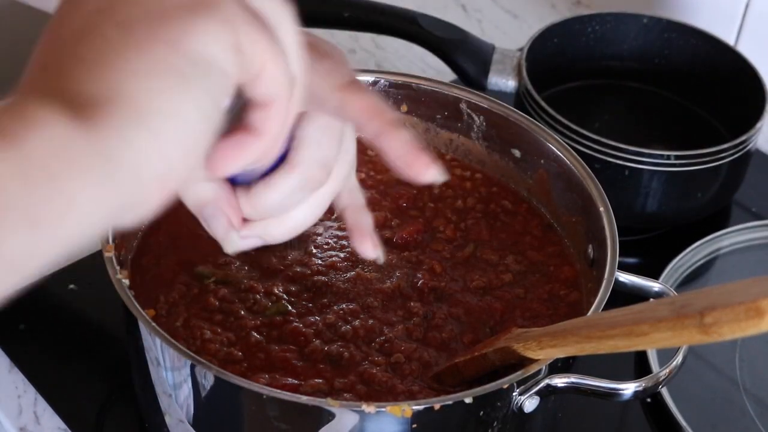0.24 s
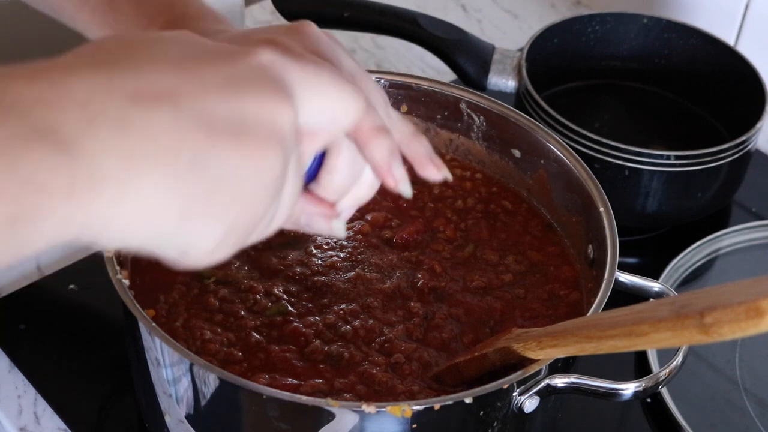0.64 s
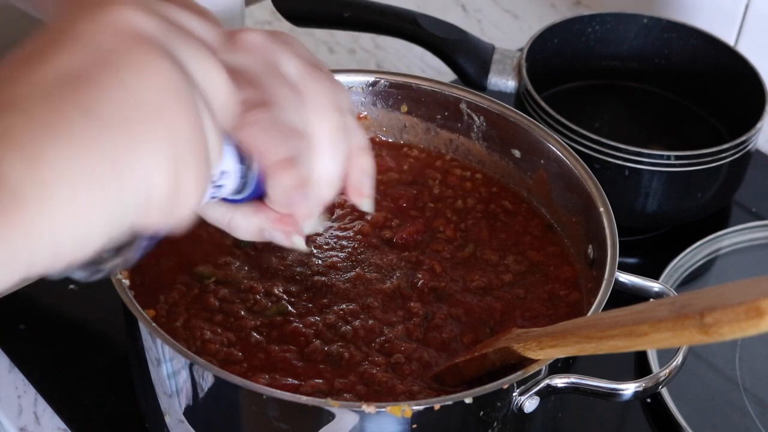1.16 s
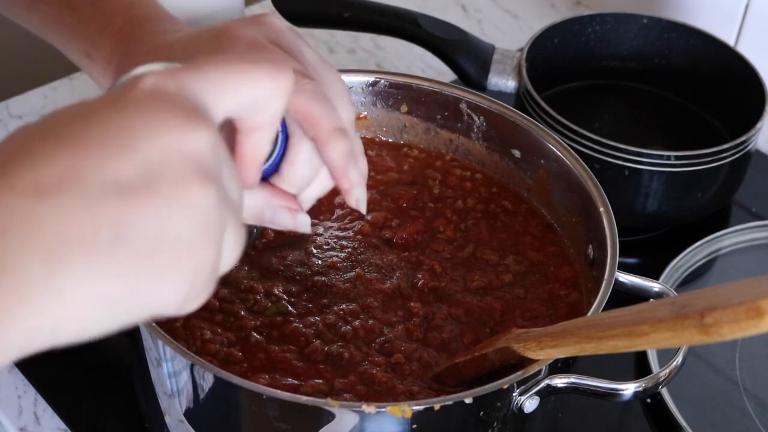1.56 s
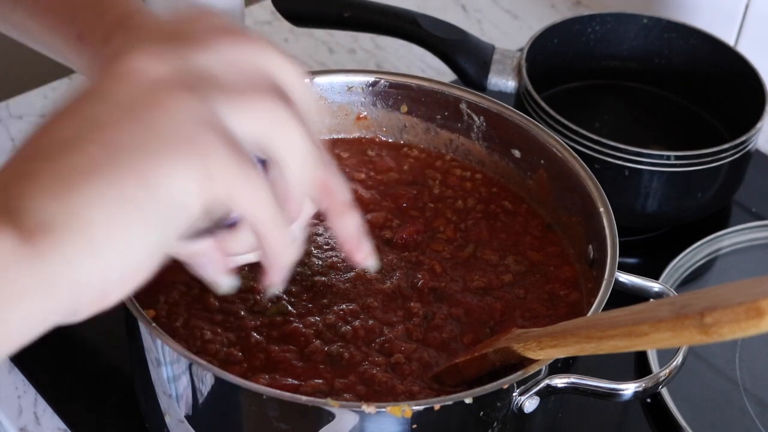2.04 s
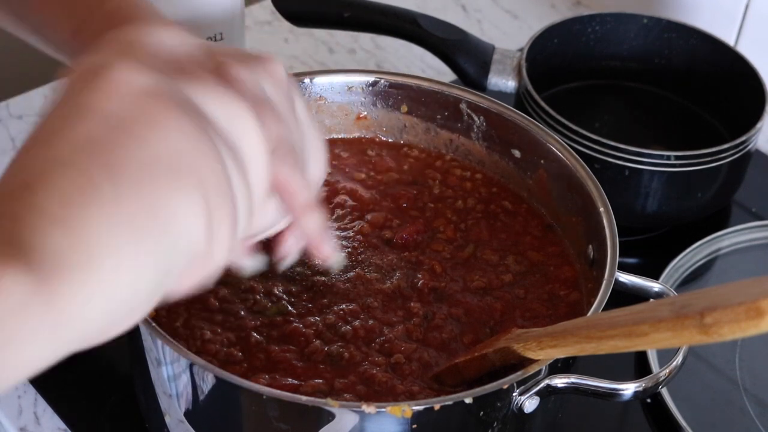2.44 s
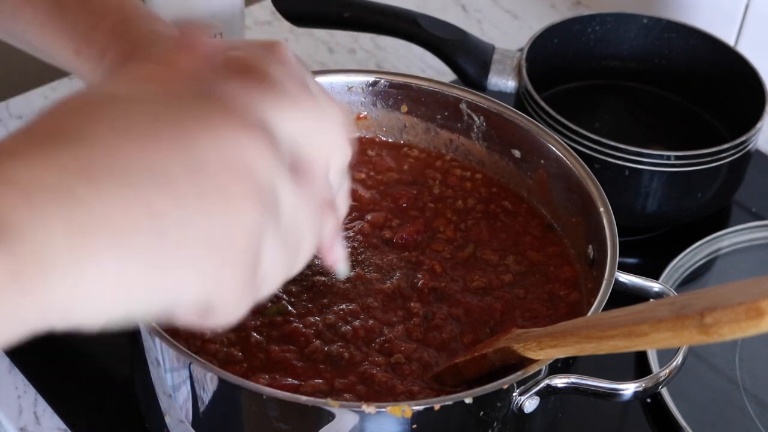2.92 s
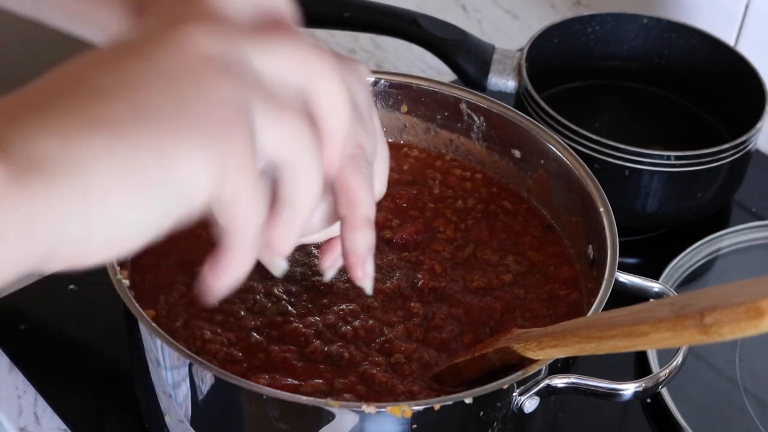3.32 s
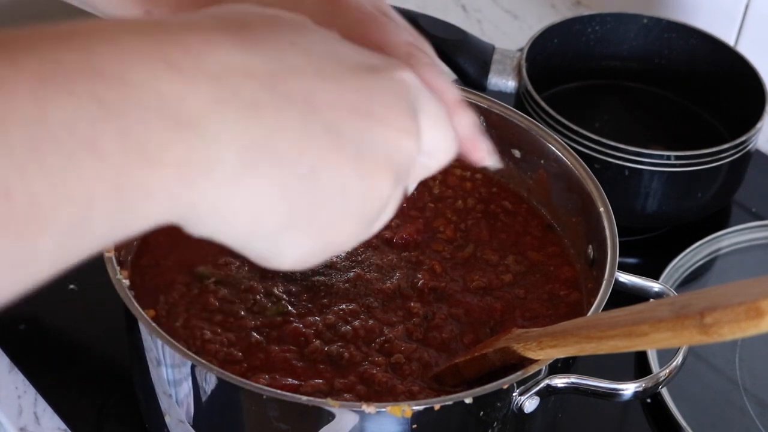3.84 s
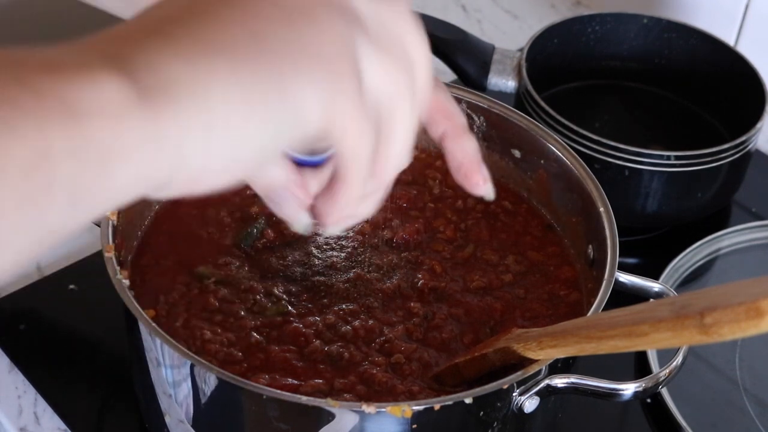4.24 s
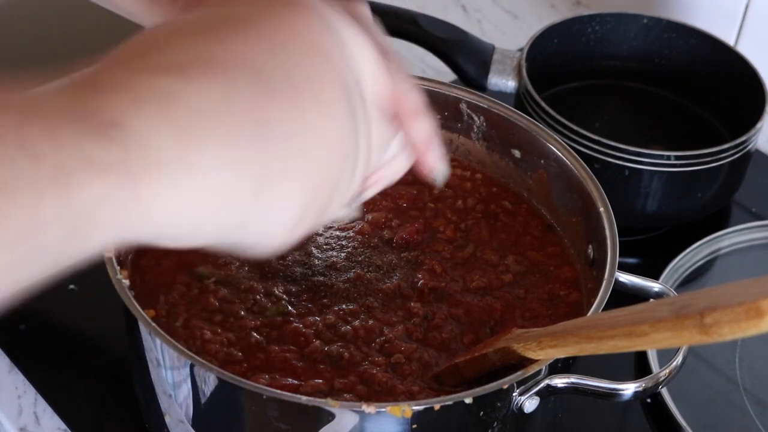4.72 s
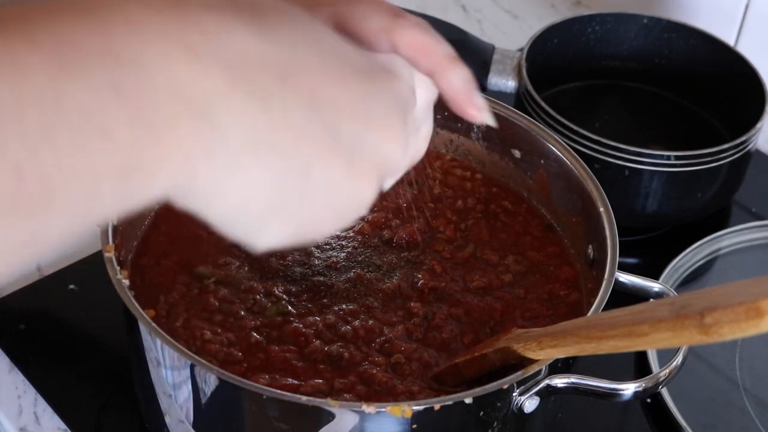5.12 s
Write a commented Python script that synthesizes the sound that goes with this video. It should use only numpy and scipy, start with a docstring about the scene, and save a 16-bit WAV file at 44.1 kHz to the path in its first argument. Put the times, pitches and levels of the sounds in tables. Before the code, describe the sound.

Close pickup of a hand pepper mill in a small, hard-surfaced kitchen. Short, dry, gritty crunches start almost at once, near 0.07, 0.34, 0.65 and 0.92 s, each lasting under a tenth of a second, with brittle peppercorn cracks inside. Then a pause: a sharp, hard tick of the loose burr at 1.2 s, with fainter ticks around it. Grinding resumes near 1.58 s and keeps about three twists a second to the end at roughly 5.3 s. Hard cracks stand out around 1.94, 2.26, 2.55 and 3.82 s; the twists near 3.15 and 3.47 s are plainer. Pitch colour and brightness shift from twist to twist, hollow and midrange. Between grinds, hands rub softly as they regrip. Quick reflections and a short room tail follow each burst. Beneath lie quiet room air, a faint low hum and a very thin, high, sputtering whistle with brief louder spurts.

```python
"""Pepper mill over a pot

A hand pepper mill is twisted about three times a second over a pot on a kitchen hob. In each twist the burr
crushes a dense run of crumbs and whole peppercorns crack: random tiny breaks drive the hollow body and the burr.
Now and then the loose burr ticks, and after each twist the hands slide to regrip, a rub of noise pulses.
Echoes from hob and pans and a short kitchen tail follow, over room air, a low hum and a thin high whistle."""
import sys
import numpy as np
from scipy import signal
from scipy.fft import rfft, irfft
from scipy.io import wavfile
from scipy.ndimage import uniform_filter1d, minimum_filter1d

SR = 44100
rng = np.random.default_rng(int(sys.argv[2]) if len(sys.argv) > 2 else 0)


def store_wav(level_fs):
    """Save 16-bit WAV to argv[1]."""
    pcm = np.round(np.clip(np.atleast_2d(level_fs), -1, 1) * 32767)
    wavfile.write(sys.argv[1], SR, pcm.T.astype(np.int16))


N = 237258
TIME = np.arange(N) / SR

# The twists of the mill: (bite time [s], slack before it [s], length [s], opening level [dB],
# closing level [dB], brightness tilt [dB], cavity pitch [Hz], weight of the lows [dB], regrip level [dB])
TWISTS = [ (0.071, .014, 0.099, -26, -25, 1, 1750, -1, -49),
          (0.339, .012, 0.074, -24, -20.5, 2.5, 2000, 3, -41),
          (0.651, 0.035, 0.065, -15, -36, 1, 1760, -4, -43),
          (0.921, .012, 0.055, -22.5, -18.5, 3, 1770, 1.5, -43),
          (1.578, .010, 0.052, -22.5, -32, 8, 1820, 3.5, -50),
          (1.891, 0.0049, 0.083, -22, -20, -2, 2387, -4.5, -43),
          (2.203, 0.017, 0.074, -18.5, -19.5, 4.5, 2300, 3.5, -44),
          (2.502, 0.0099, 0.097, -21.5, -25, 1.5, 2280, -3, -51),
          (2.805, 0.0097, 0.095, -23, -23, 1.5, 2210, 3, -49.5),
          (3.146, .013, 0.071, -17, -20.5, 3, 2270, 2.5, -52),
          (3.469, .010, 0.079, -26, -23.5, 1, 2400, -1.5, -51),
          (3.774, .008, 0.082, -22.5, -22.5, -0.5, 1710, -1.5, -42),
          (4.094, .011, 0.054, -20, -20, 2, 1740, 3, -43),
          (4.425, 0.0048, 0.061, -19, -19, 1, 2660, 2.5, -37.5),
          (4.770, .036, 0.061, -17, -22.5, 1.5, 1716, 1.5, -45.5),
          (5.050, 0.0078, 0.075, -19.5, -18, 4.5, 1740, 3.5, -47)]


def undb(db):
    """Decibels to gain."""
    return 10 ** (np.asarray(db) / 20)


def unit(x):
    """Scale to rms 1."""
    return x / np.sqrt(np.mean(x ** 2) + 1e-18)


def along(hz, table):
    """Read (frequency, value) points on a log-frequency axis."""
    points, values = np.transpose(table)
    return np.interp(np.log(hz + 1), np.log(points), values)


def bump(hz, centre_hz, width_hz):
    """Shape of one resonance, 1 at its centre."""
    return 1 / (1 + (2 * (hz - centre_hz) / width_hz) ** 2)


def noise(gain):
    """Noise of rms 1: a white spectrum shaped by gain(Hz)."""
    spectrum = rfft(rng.standard_normal(N))
    return unit(irfft(spectrum * gain(np.fft.rfftfreq(N, 1 / SR)), N))


def add(out, start, x):
    """Mix x in at a time in seconds."""
    i = max(int(start * SR), 0)
    out[i:i + len(x)] += x[:max(N - i, 0)]


def background(air_db=-54.5, hum_db=-62.5):
    """Still room air as coloured noise, and a low hum that wavers because it is narrow-band noise."""
    # Colour of the room air: (frequency [Hz], relative level [dB])
    air_colour = [(25, 3.5), (80, 0), (200, 3), (450, 2), (750, 3), (1300, -12), (2000, -29), (3500, -7),
                  (9000, -11.5), (11500, -13), (16000, -32)]
    air = undb(air_db) * noise(lambda hz: undb(along(hz, air_colour)))
    hum = undb(hum_db) * noise(lambda hz: bump(hz, centre_hz=116.9, width_hz=17.0))
    return air + hum


def whistling(whistle_db=-58, whistle_hz=10070, wander_db=4.0, edge_s=0.0066, sputter_db=6.0):
    """A narrow band of noise whistles thinly; slow noise wanders its level and faster noise sputters it."""
    # The louder spurts, added to the steady whistle: (start [s], length [s], level [dB])
    spurts = [(1.242, 0.084, -44), (1.452, .06, -45), (2.037, .045, -48), (2.172, .025, -42),
              (3.638, .025, -52), (4.353, 0.059, -45)]
    wander = noise(lambda hz: bump(hz, centre_hz=3.3, width_hz=7.3) ** 2)
    level = undb(whistle_db + wander_db * wander)
    for start, length, db in spurts:
        edges = [0, edge_s, length, length + edge_s]
        level = level + undb(db) * np.interp(TIME - start, edges, [0, 1, 1, 0])
    flutter = noise(lambda hz: bump(hz, centre_hz=28, width_hz=100) ** 2)
    sputter = undb(sputter_db * np.tanh(flutter))
    tone = noise(lambda hz: bump(hz, centre_hz=whistle_hz, width_hz=330))
    return level * unit(tone * sputter)


def kitchen(x, near_db=-5, near_t60=0.067, tail_db=-2, size=24000):
    """Quick reflections from hob and pans, then the room's tail; the mill moves, so the echo paths change."""
    # Bands of the room's tail: (centre [Hz], level before the overall tail level [dB], t60 [s])
    tail_bands = [(200, -4.5, 0.34), (704, -5.5, 0.5), (1270, -11.5, 0.51), (1880, -5, 0.41),
                  (3500, -6, 0.54), (6140, -5.5, 0.49), (8900, -6, 0.31), (14000, -9, 0.27)]
    t = np.arange(size) / SR
    centres = np.log([row[0] for row in tail_bands])
    near = undb(-60 * t / near_t60) * (t > .001)
    paths = [(rng.standard_normal(N), undb(near_db) * near / np.linalg.norm(near))]
    # neighbouring tail bands crossfade, each a noise wash with its own decay
    for share, (_, db, t60) in zip(np.eye(len(tail_bands)), tail_bands):
        band = np.sqrt(np.interp(np.log(np.fft.rfftfreq(N, 1 / SR) + 1), centres, share))
        fade = undb(-60 * t / t60) * (1 - np.exp(-t / 0.012))
        wash = irfft(rfft(rng.standard_normal(N)) * band, N)
        paths.append((wash, undb(db + tail_db) * fade / np.linalg.norm(fade)))
    # every twentieth of a second the mill is somewhere else and meets other echoes
    out, hop = x.copy(), SR // 20
    for i in range(0, N, hop):
        place = rng.integers(N - size)
        response = sum(wash[place:place + size] * fade for wash, fade in paths)
        add(out, i / SR, signal.fftconvolve(x[i:i + hop], response))
    return out


def mill(force, bright_db, cavity_hz, low_db, cavity_db=6, cavity_width_hz=330, size=2048):
    """Pass a force through the resonances of mill and pot; the grip shifts the pitch of the cavity."""
    # Colour of the crunch: (frequency [Hz], relative level [dB])
    crunch_colour = [(60, -41.5), (250, -18), (600, -11), (800, -8), (1350, -4.5), (1700, 1), (2500, 2),
                     (3200, -4), (4500, -4.5), (5500, -0.5), (8400, -3), (10800, -15.5), (13500, -13),
                     (16000, -17)]
    # Resonances of the mill and the pot under it: (frequency [Hz], width [Hz], lift [dB])
    body_modes = [(772, 21, 6), (1000, 205, 7.5), (1146, 51, 4.5), (1610, 74, 0.5), (1713, 147, 4),
                  (2130, 37, 0.5), (2290, 43, -2.5), (2490, 55, -6), (3630, 120, 0), (5490, 110, 1),
                  (6650, 890, -3), (8740, 330, 2)]
    hz = np.fft.rfftfreq(size, 1 / SR)
    db = along(hz, crunch_colour) + sum(lift * bump(hz, f, w) for f, w, lift in body_modes)
    db = db + cavity_db * bump(hz, cavity_hz, cavity_width_hz)
    # brightness tilts the spectrum about 3500 Hz; the lows are a shelf below 1300 Hz
    db = db + bright_db * np.tanh(np.log((hz + 1) / 3500))
    db = db + low_db / (1 + (hz / 1300) ** 4)
    # folding the cepstrum makes the response causal: sharp attack, then ring
    cepstrum = irfft(np.log(undb(db)))
    cepstrum[1:size // 2] *= 2
    cepstrum[size // 2 + 1:] = 0
    return signal.fftconvolve(force, irfft(np.exp(rfft(cepstrum))))


def fractures(t, per_s, spread_db):
    """Tiny breaks of either sign at random moments: many weak ones and a few strong."""
    chance, size, sign = rng.random((3, len(t)))
    strength = undb(spread_db * -np.log(.02 + .98 * size))
    return (chance < per_s / SR) * np.sign(sign - .5) * strength


def handling(unrest_db=3.0, hold_db=-59, settle_db=-43, rise_s=.04, fade_db_per_s=69):
    """Hands rub the hollow body, which sounds softly; each regrip after a twist swells, then dies away."""
    slide = undb(hold_db)
    for start, _, length, *_, regrip_db in TWISTS:
        since = np.maximum(TIME - start - length, 0)
        swell = np.minimum(since / rise_s, 1)
        slide = slide + swell * undb(regrip_db - fade_db_per_s * np.maximum(since - rise_s, 0))
    stir = undb(unrest_db * noise(lambda hz: bump(hz, centre_hz=11, width_hz=46)))
    rub = fractures(TIME, per_s=2500, spread_db=3.5) * stir
    # two cavity pitches sound together
    body = mill(rub, bright_db=-2.5, cavity_hz=2207, low_db=-3, cavity_db=17.5, cavity_width_hz=190)
    body = body + mill(rub, bright_db=-3.5, cavity_hz=1866, low_db=-9.0, cavity_db=17, cavity_width_hz=130)
    # the hands are already settling on the mill before the first twist
    settling = undb(settle_db - fade_db_per_s * TIME)
    return unit(body[:N]) * (slide + settling)


def snap(db, crumble_s, bright_db, cavity_hz, cavity_db, ring_db, width_hz=200, low_db=-4.5,
         ring_db_per_octave=1.5, split_db=-5, size=6000):
    """A short avalanche of breaks around one clean split sounds the mill; the burr rings in decaying modes."""
    # Modes of the burr: (frequency [Hz], relative level before the tilt per octave [dB], t60 [s])
    burr_modes = [(855, -11, 0.13), (2110, -22, .06), (2190, 4, 0.19), (2904, -11.5, 0.07),
                  (4560, -30, .02), (6380, 1, 0.06), (6670, -11, 0.055), (6620, 1.5, 0.087),
                  (6590, -14, 0.027), (7100, -22, .06)]
    waver_share = 0.047  # rms waver as a share of each mode's pitch
    t = np.arange(size) / SR
    avalanche = np.sqrt(t / crumble_s) * np.exp(-(t / crumble_s) ** 1.45)
    force = fractures(t, per_s=18000, spread_db=2.0) * avalanche
    # one clean split stands out at the height of the avalanche
    force[np.argmax(avalanche)] += undb(split_db) * np.linalg.norm(force)
    crack = mill(force, bright_db, cavity_hz, low_db, cavity_db, cavity_width_hz=width_hz)
    crack = unit(crack[:size])
    # crumbs pressing on the burr make its modes waver, which blurs the ring
    waver = unit(uniform_filter1d(rng.standard_normal((len(burr_modes), size)), size=60, axis=1))
    clocks = np.cumsum(1 + waver_share * waver, axis=1) / SR
    ring = np.zeros(size)
    for (f, mode_db, t60), clock in zip(burr_modes, clocks):
        decay = undb(mode_db + ring_db_per_octave * np.log2(f) - 60 * t / t60)
        ring += decay * np.sin(2 * np.pi * f * clock)
    # the level is the energy taken over six milliseconds
    gain = undb(db) * np.sqrt(.006 * SR / size)
    return gain * (crack + undb(ring_db) * unit(ring))


def ticking(hard_db_per_octave=7.5):
    """The loose burr ticks now and then, once sharply; the hard contact favours its high modes."""
    # The loose burr knocking between twists: (time [s], level [dB], brightness tilt [dB],
    # cavity pitch [Hz], cavity lift [dB], burr ring against the knock [dB])
    knocks = [(1.128, -33.5, 16, 2190, 3, -20), (1.2008, -12.5, 0.5, 3890, 5, -3.5),
              (1.338, -38.5, -1, 2250, 12, -19), (1.443, -44, 13, 2200, 3, -19.5),
              (4.698, -31, -1.5, 3320, 14.5, -21)]
    out = np.zeros(N)
    for start, db, bright_db, cavity_hz, cavity_db, ring_db in knocks:
        tick = snap(db, .0022, bright_db, cavity_hz, cavity_db, ring_db, width_hz=720, low_db=-4,
                    ring_db_per_octave=hard_db_per_octave, split_db=1.5)
        add(out, start, tick)
    return out


def cracking():
    """Whole corns give way under the burr as short avalanches of breaks, each with its own colour."""
    # Whole peppercorns cracking: (time [s], level [dB], crumbling time [s], brightness tilt [dB],
    # cavity pitch [Hz], cavity lift [dB], burr ring against the crack [dB])
    corns = [ (0.121, -23, 0.0034, -8, 1830, 0, -13), (0.158, -21, 0.0019, 4, 1790, 12, -5),
             (0.394, -11, 0.0031, 1, 2010, 14, -7), (0.657, -15, .003, -15, 1730, 8, -7),
             (0.684, -18.5, 0.0036, -9, 1730, 3, -13), (0.691, -10, 0.0022, 3, 1790, 3, -24),
             (0.705, -14, 0.0014, 0, 1800, 10, -20), (0.912, -25, 0.0023, -6, 2230, 11, -16),
             (1.536, -28.5, .0023, -9, 2310, 14.5, -16), (1.543, -26, 0.0059, 6, 2370, 9, -16),
             (1.580, -11, 0.0047, -1.5, 2200, 6.5, -22), (1.591, -21, 0.0021, 6, 1780, 3, -30),
             (1.8864, -21, 0.00065, -8, 2240, 13, -23), (1.912, -11, 0.0061, 0, 2360, 4, -8.5),
             (1.9368, -8.5, 0.0037, 0.5, 2344, 16, -10), (2.203, -16.5, 0.0022, -1, 2100, 9, -9),
             (2.259, -7, 0.0022, -5, 2110, 10, -13), (2.508, -21.5, .003, -2, 1980, -1, -10),
             (2.522, -15, 0.002, -6, 1860, 10, -22), (2.547, -10.5, 0.0048, -4, 2190, 7, -23),
             (2.5514, -6.5, 0.0035, -3.5, 2100, 1, -8.5), (2.827, -22.5, 0.0019, -3, 2260, 15, -28),
             (2.852, -12.5, 0.005, -7, 2140, 11, -12), (3.146, -19.5, 0.0019, -4, 1990, 7, -22),
             (3.504, -17.5, 0.0068, 3, 2280, 3, -22), (3.803, -11.5, .0022, 0.5, 1710, -13, -12.5),
             (3.8232, -7, .004, -0.5, 1656, 16.5, -14), (3.846, -18.5, 0.0022, 2, 1750, 11, -12),
             (4.096, -25, .0015, -1, 2200, 12, -15), (4.108, -20.5, 0.0019, -1, 2200, 14, -12),
             (4.1487, -12, .0012, -2.5, 1774, 11, -7), (4.422, -14, 0.0036, -3, 2600, 8, -15),
             (4.431, -21, 0.0028, -3, 1790, 9, -18), (4.444, -16.5, .002, 0, 2860, 10, -21),
             (4.465, -17.5, .0014, 8, 1640, 14, -17), (4.745, -22.5, 0.0026, -7.5, 1700, -4, -21),
             (4.770, -17, 0.0037, -3, 1660, 12, -6), (4.799, -13.5, 0.0067, -1.5, 1660, -8, -12),
             (4.818, -14, 0.0051, 8, 2130, 8, -11), (5.075, -18, 0.003, -7, 1720, -10, -22),
             (5.112, -17.5, .001, 2, 1720, 8, -11)]
    out = np.zeros(N)
    for start, *corn in corns:
        add(out, start, snap(*corn))
    return out


def crumbs(t, per_s, spread_db, surge_db=3.0):
    """A run of breaks that surges every few milliseconds as the teeth catch and slip."""
    catches = t[0] + np.cumsum(rng.uniform(0.00223, 0.00727, size=100))
    surge = np.interp(t, catches, rng.standard_normal(len(catches)))
    return unit(fractures(t, per_s, spread_db) * undb(surge_db * surge))


def grinding(slack_db=-33, touch_db=-40, bite_s=.002, release_s=.006, contrast_db=3):
    """Each twist takes up its slack, then crushes coarse, dull crumbs and fine, bright ones."""
    out = np.zeros(N)
    for start, slack_s, length, open_db, close_db, bright_db, cavity_hz, low_db, _ in TWISTS:
        t = np.arange(int((slack_s + length + 5 * release_s) * SR)) / SR - slack_s
        # taking up the slack scrapes alike every time, however hard the burr then bites
        moments = [-slack_s, -slack_s / 2, 0, bite_s, length]
        press_db = np.interp(t, moments, [touch_db, slack_db, slack_db, open_db, close_db])
        effort = undb(press_db) * np.exp(-np.maximum(t - length, 0) / release_s)
        coarse_force = crumbs(t, per_s=4000, spread_db=4) * effort
        coarse = mill(coarse_force, bright_db - contrast_db, cavity_hz, low_db,
                      cavity_db=4.5, cavity_width_hz=140)
        fine_force = crumbs(t, per_s=2000, spread_db=5) * effort
        fine = mill(fine_force, bright_db + contrast_db, cavity_hz, low_db)
        sound = unit(coarse) + unit(fine)
        # the sound carries the energy of the effort
        add(out, start - slack_s, sound * np.linalg.norm(effort) / np.linalg.norm(sound))
    return out


def scene():
    """The mill echoes in the kitchen; air, hum and whistle are laid over it without echoes."""
    mill_sounds = grinding() + cracking() + ticking() + handling()
    return (kitchen(mill_sounds) + background() + whistling())[None]


def record(dry, top_hz=15900):
    """A quick limiter catches the loudest cracks at full scale; a steep low-pass cuts the top."""
    room_left = 1 / np.maximum(np.abs(dry), 1)
    gain = uniform_filter1d(minimum_filter1d(room_left, size=45), size=45)
    top_cut = signal.ellip(10, .2, 70, top_hz, fs=SR, output="sos")
    return signal.sosfilt(top_cut, dry * gain)


dry = scene()
out = record(dry)
store_wav(out)
```